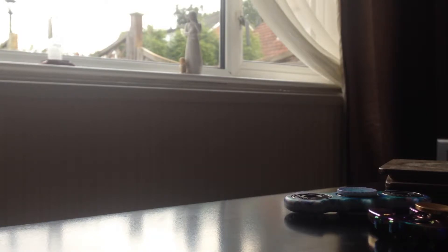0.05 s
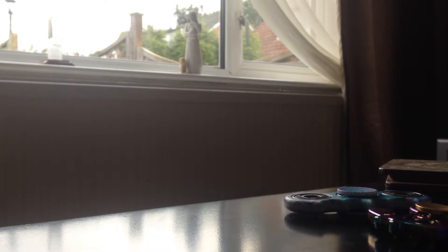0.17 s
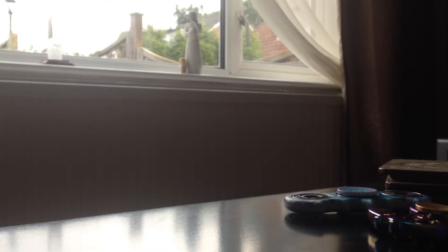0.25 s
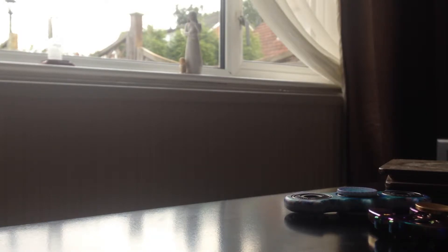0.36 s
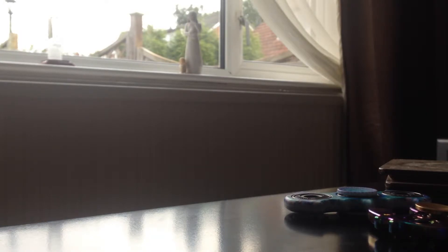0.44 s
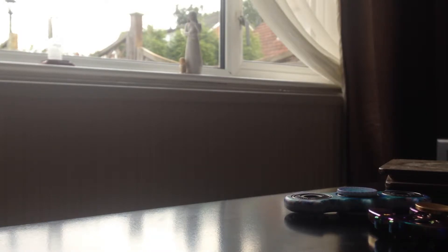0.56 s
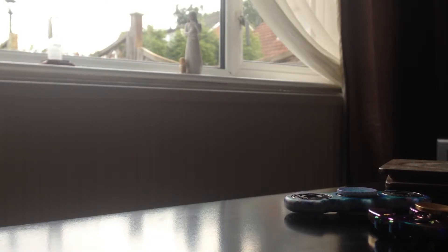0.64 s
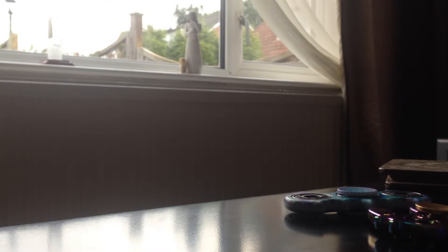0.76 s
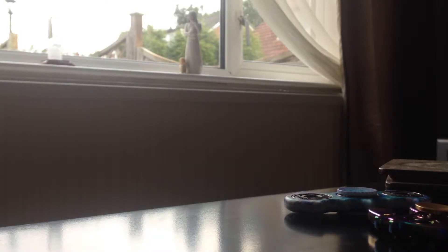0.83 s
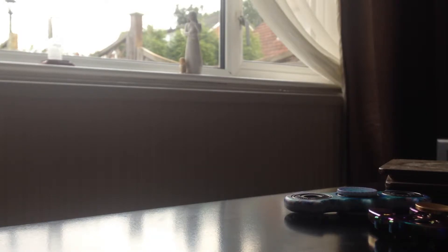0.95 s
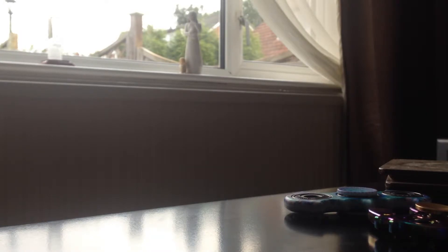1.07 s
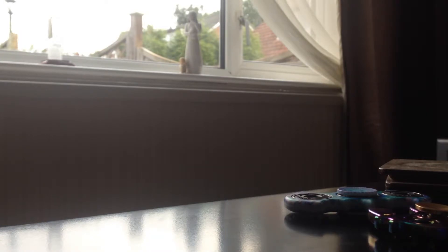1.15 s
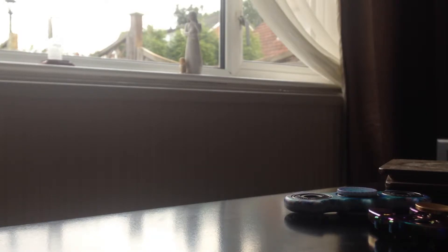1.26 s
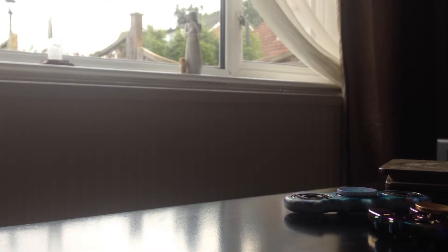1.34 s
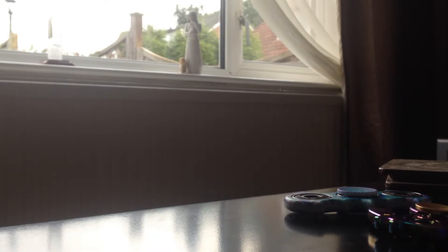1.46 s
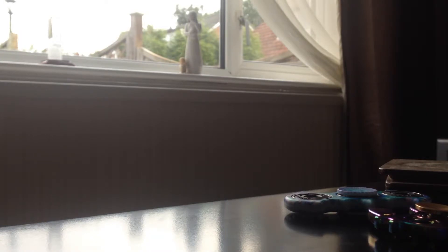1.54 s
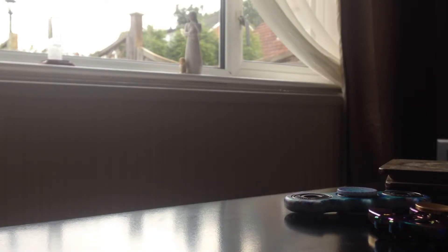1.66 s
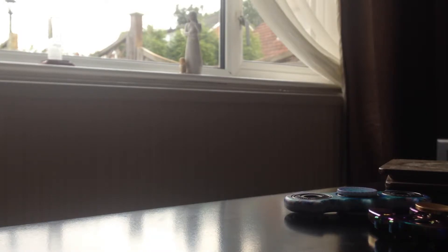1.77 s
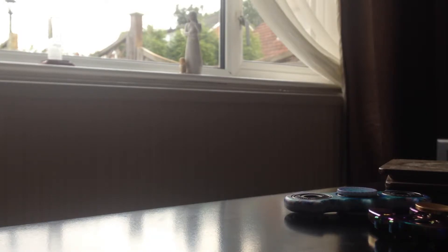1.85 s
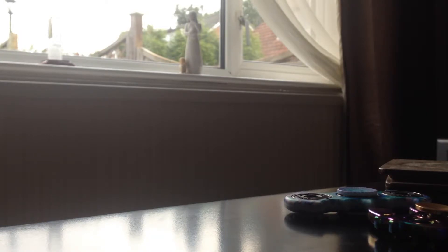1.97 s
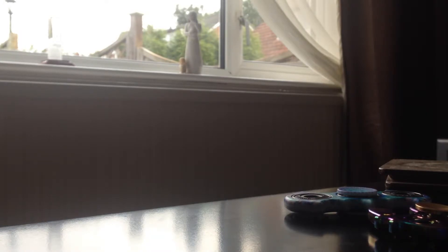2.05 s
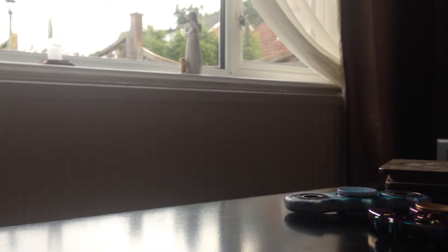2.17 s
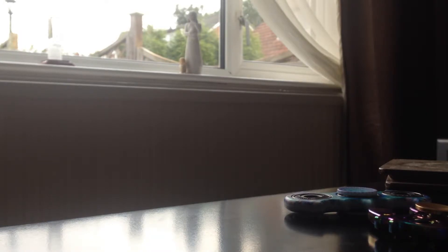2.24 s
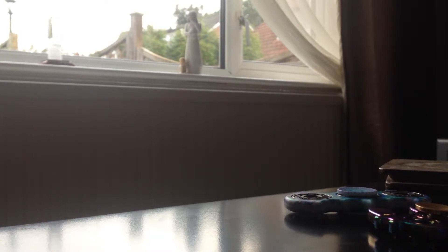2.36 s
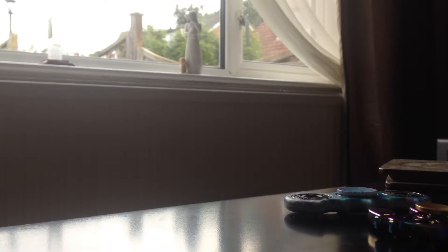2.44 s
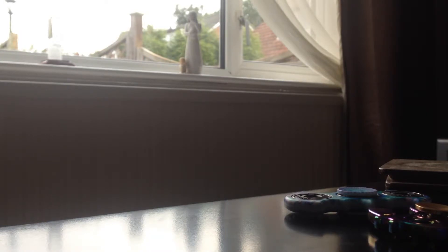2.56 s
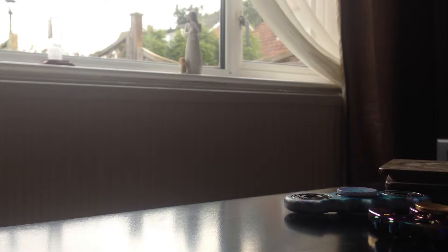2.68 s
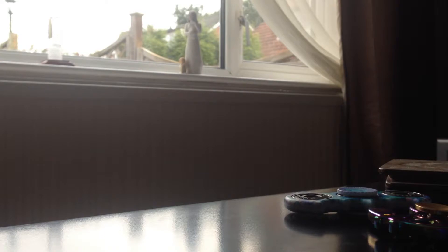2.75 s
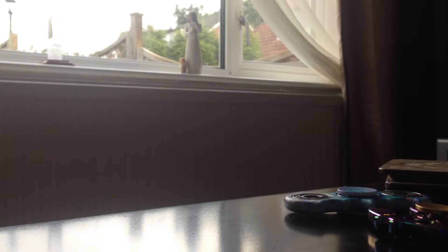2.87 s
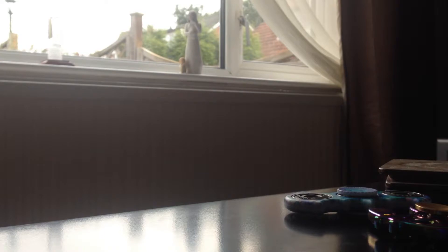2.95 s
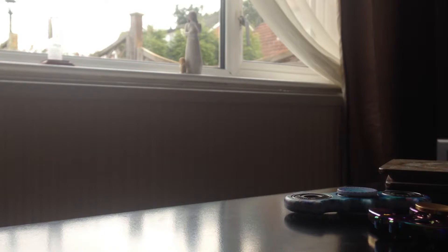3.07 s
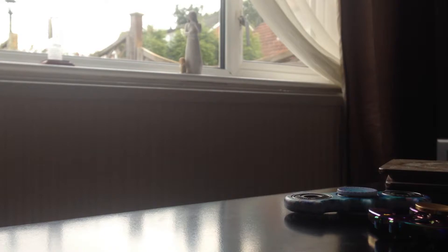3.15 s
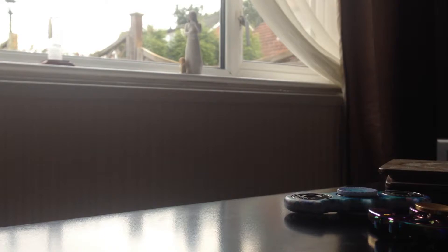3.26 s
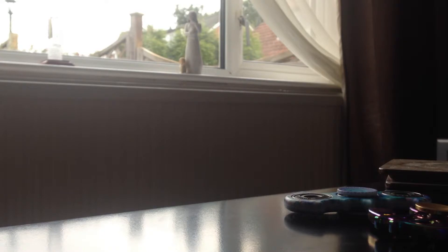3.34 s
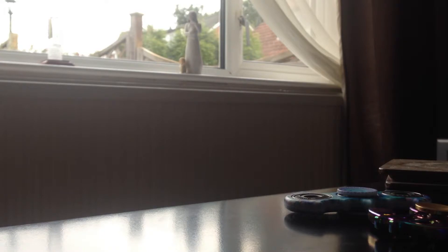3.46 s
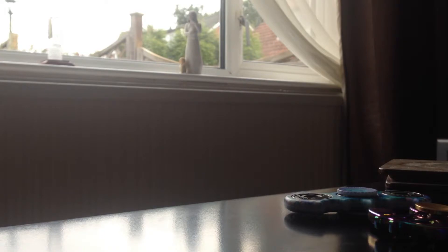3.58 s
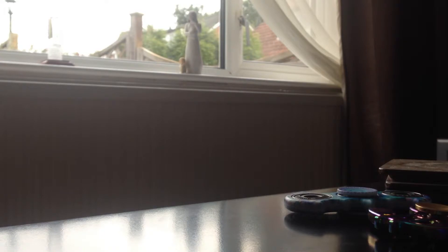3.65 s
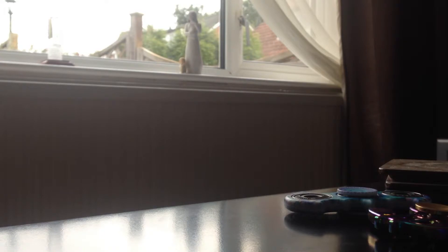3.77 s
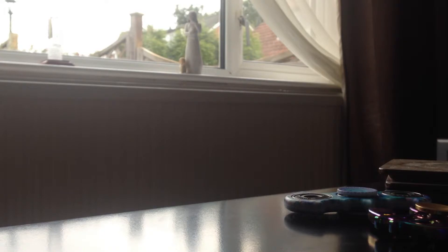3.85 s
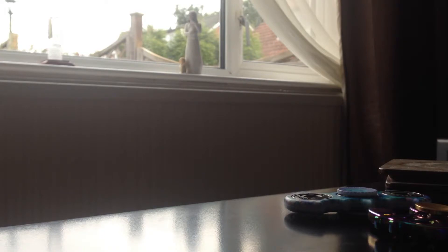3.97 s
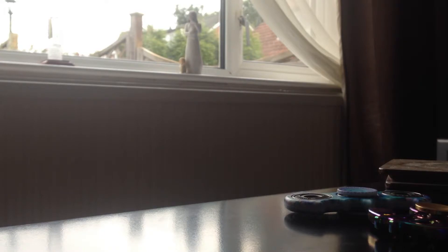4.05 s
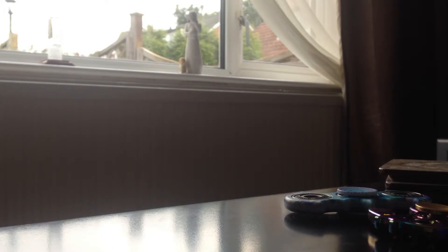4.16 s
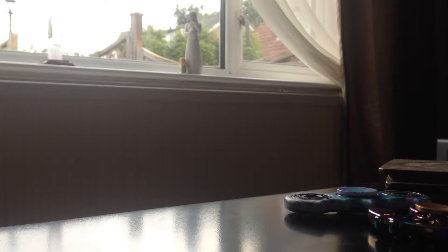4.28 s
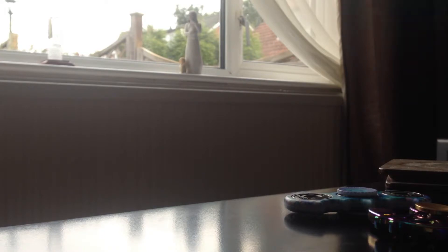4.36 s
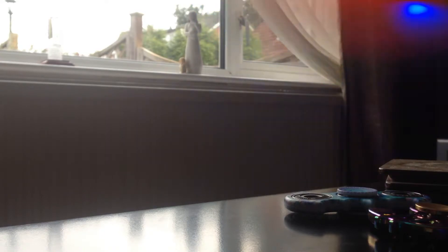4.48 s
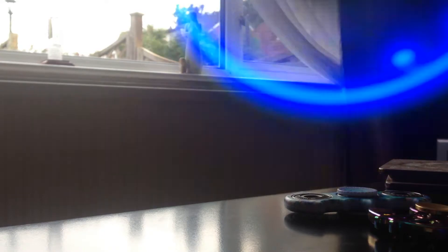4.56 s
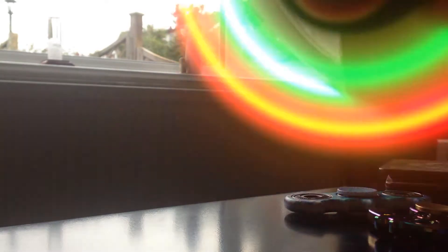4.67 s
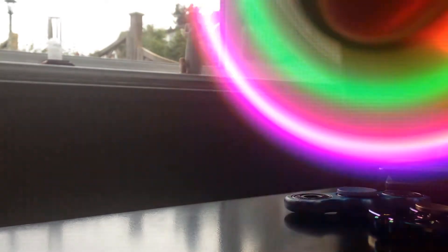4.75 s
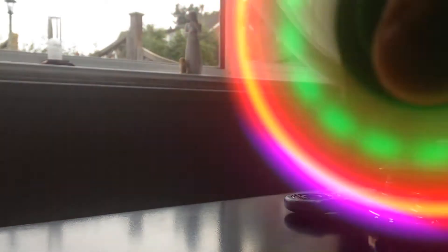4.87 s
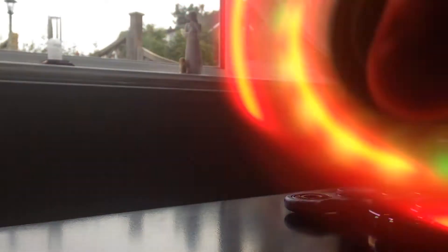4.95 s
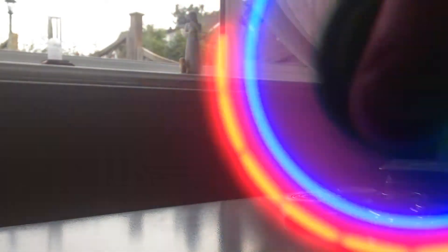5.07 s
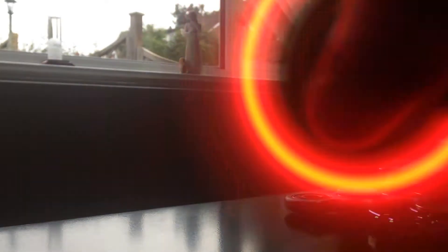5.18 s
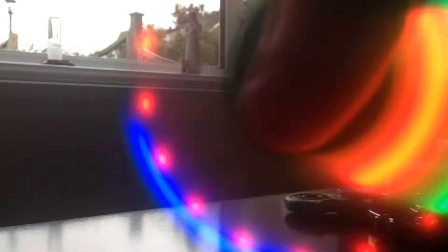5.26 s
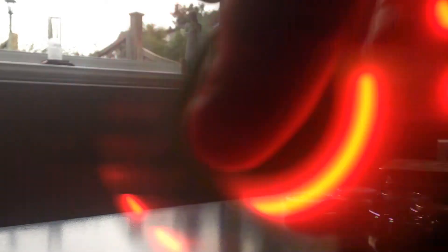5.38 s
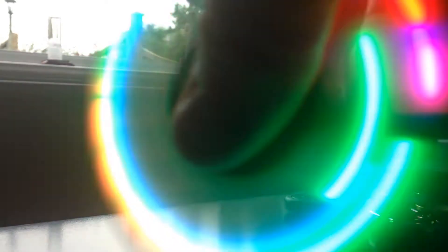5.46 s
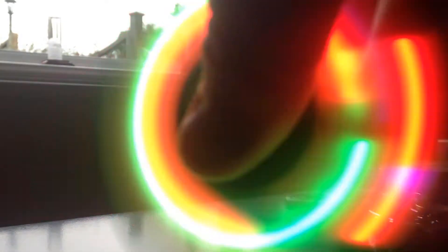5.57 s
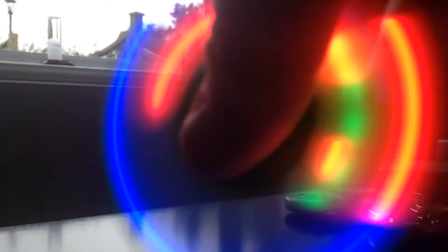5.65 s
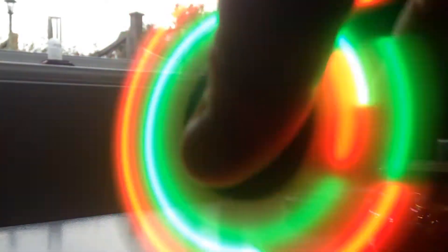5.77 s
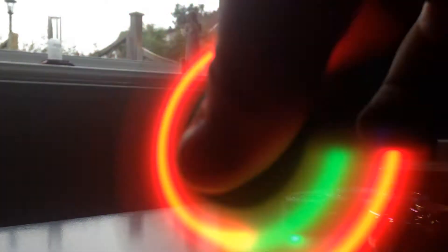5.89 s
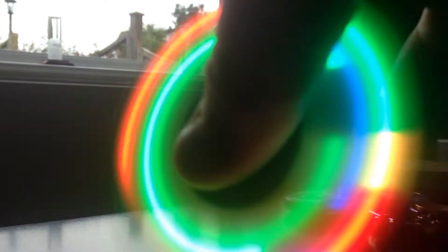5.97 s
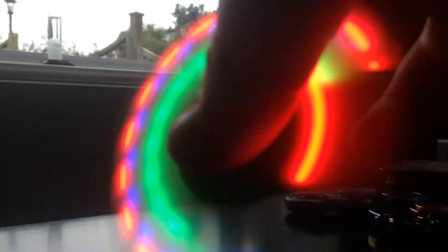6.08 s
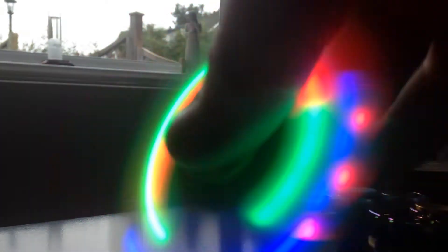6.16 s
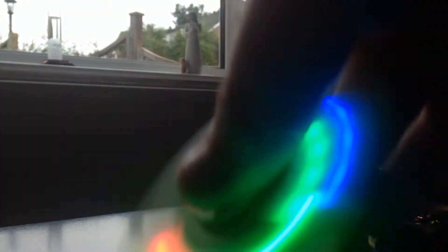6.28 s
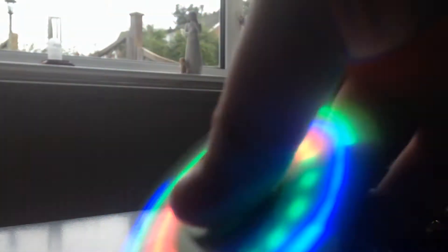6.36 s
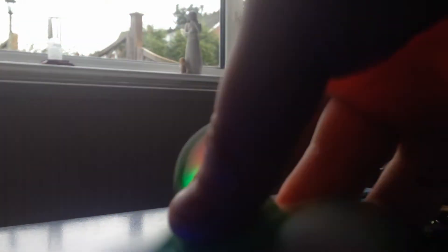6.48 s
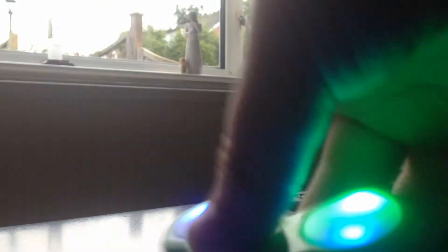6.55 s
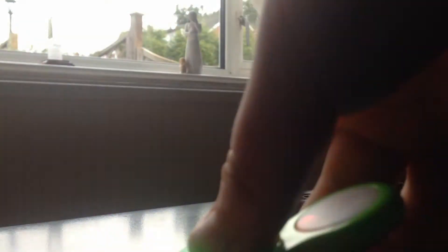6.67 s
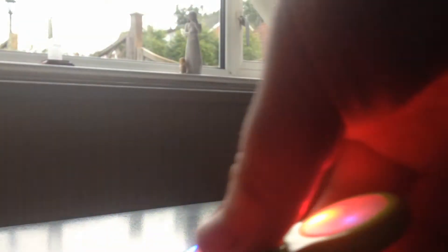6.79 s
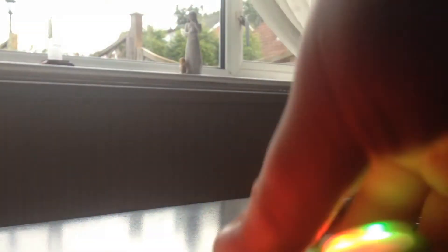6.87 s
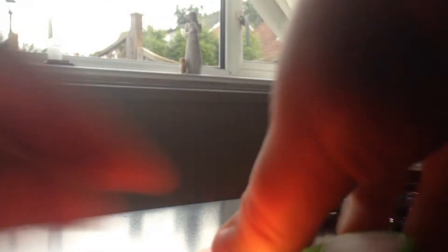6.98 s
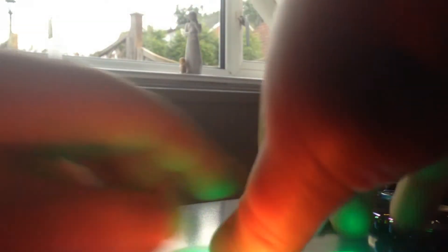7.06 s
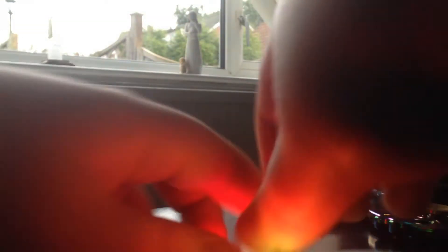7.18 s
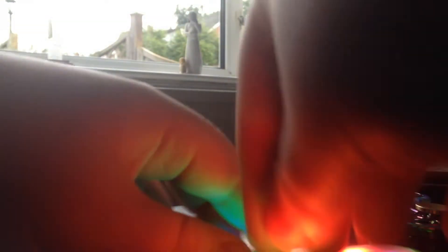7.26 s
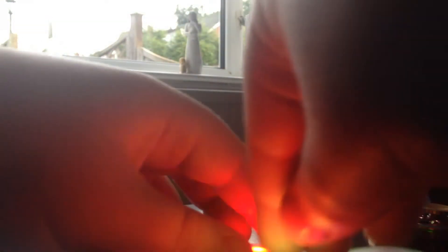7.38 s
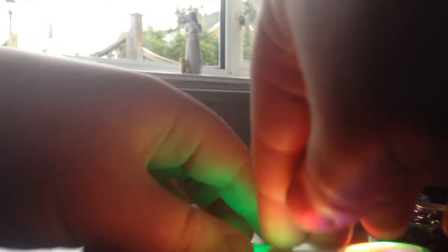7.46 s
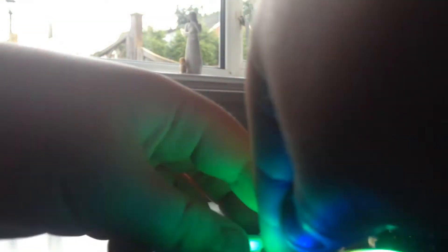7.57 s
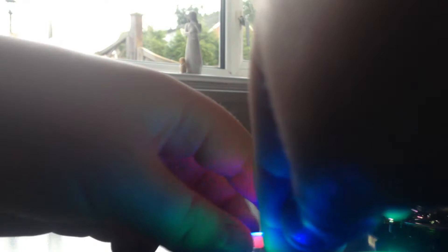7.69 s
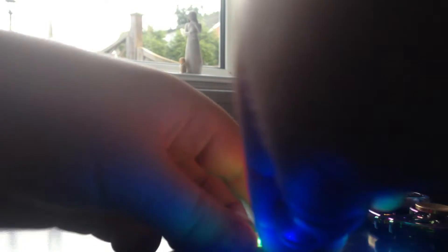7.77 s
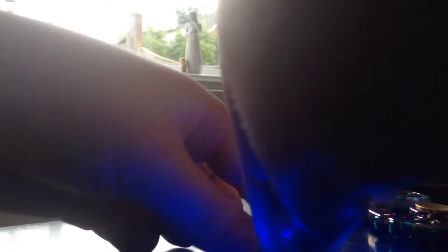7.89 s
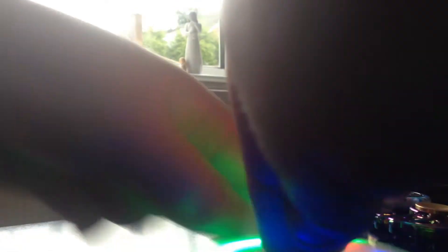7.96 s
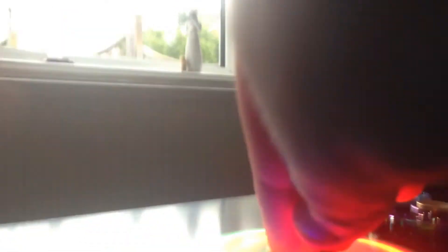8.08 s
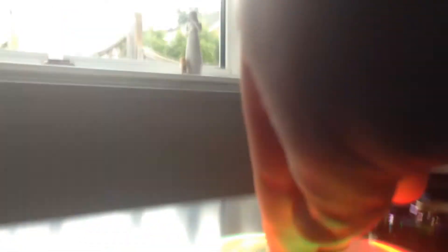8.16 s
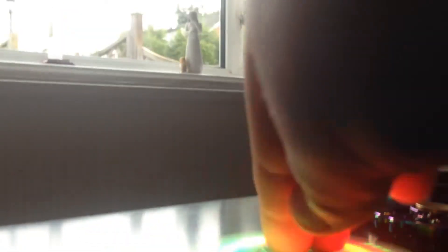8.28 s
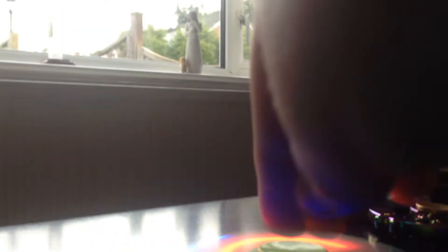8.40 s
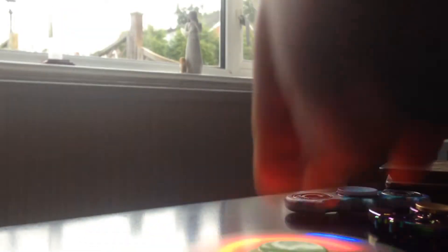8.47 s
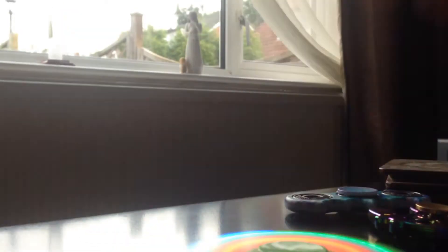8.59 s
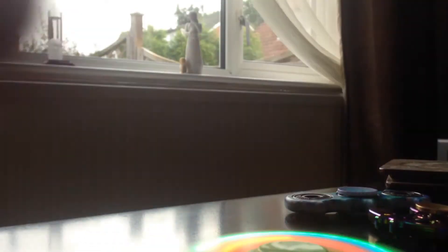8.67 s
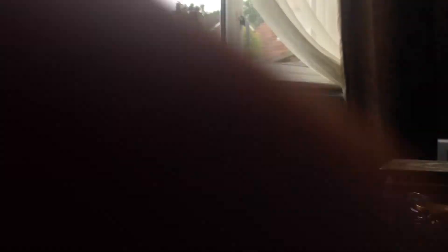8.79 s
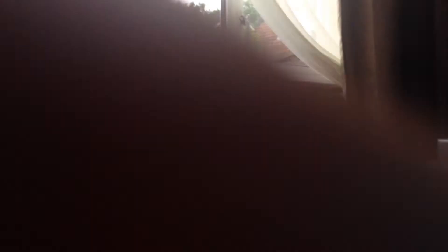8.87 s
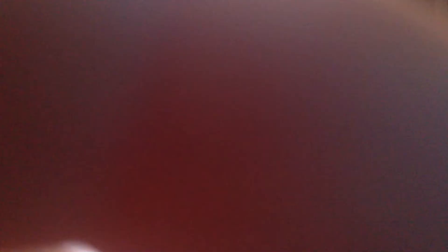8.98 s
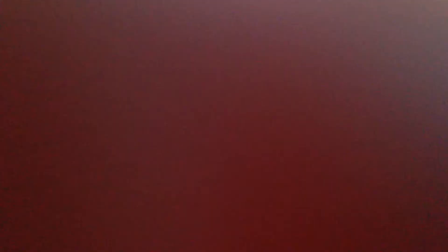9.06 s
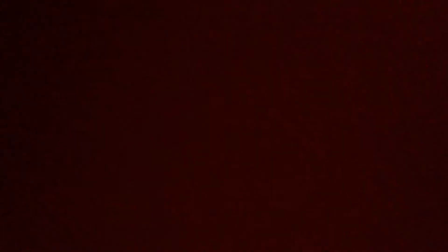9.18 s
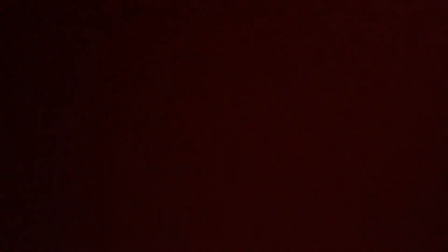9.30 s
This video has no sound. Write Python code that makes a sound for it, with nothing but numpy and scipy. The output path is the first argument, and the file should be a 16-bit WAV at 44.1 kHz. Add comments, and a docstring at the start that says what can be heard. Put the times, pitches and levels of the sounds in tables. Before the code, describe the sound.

Near-silent room, a flicked fidget spinner hisses and flutters in the hand, knocks hard on the tabletop, spins there, ends with muffled thumps.

```python
"""A three-armed plastic fidget spinner in a quiet room: ball collisions hiss through steady resonances.
After a few faint handling ticks it is flicked and whirs in the hand, clips the table four times and stops.
It clacks as it is laid flat, is flicked again and whirs on the table top, which acts as a sounding board.
Knocks, scuffs and pings are ringing modes set off by short contacts; sliding fingers are grains of noise.
At the end a hand covers and bumps the microphone with dull thumps and a rumble, over room air and hum."""
import sys
import numpy as np
from scipy import signal
from scipy.fft import rfft, irfft
from scipy.io import wavfile

SR = 44100
rng = np.random.default_rng(int(sys.argv[2]) if len(sys.argv) > 2 else 0)


def store_pcm(level_fs):
    """Save levels as 16-bit WAV."""
    pcm = np.round(np.clip(level_fs, -1, 1) * 32767).astype(np.int16)
    wavfile.write(sys.argv[1], SR, np.atleast_2d(pcm).T)


N = 411453
T = np.arange(N) / SR

# Colour tables are relative spectra [f/Hz, level/dB per Hz].
# still room air
AIR_COLOUR = [(15, -41.5), (25, -30), (101, -10.5), (133, -16.5), (359, -20.5), (495, -21.5), (620, -17.5),
              (1270, -26.5), (3170, -30.5), (6050, -34.5), (15500, -42)]
# two close low hums that beat [f/Hz, level/dB]
HUM = [(98.2, -76.5), (99.72, -79.5)]
# reverberation [f/Hz, t60/s, level/dB]
ROOM = [(200, 0.33, -16), (500, 0.9, -12.5), (900, 0.4, -11), (2020, 0.17, -12), (4930, 0.38, -23),
        (9100, 0.15, -19.5), (15200, .2, -24.5)]
# light handling ticks [t/s, level/dB, hardness/dB]
TICKS = [(1.044, -71, 3), (1.161, -61.5, -5), (1.49, -59, -8), (1.677, -65, 8), (1.877, -66, 5),
         (2.143, -58, -1.5), (2.332, -82.5, 25), (2.63, -64, -3), (2.885, -62.5, -4), (4.551, -59.5, 19),
         (7.151, -42, -2), (7.166, -45, -8), (7.354, -62.5, 10), (7.643, -55.5, 6), (7.6556, -58, 4),
         (7.683, -67, 12), (7.713, -63, -13), (7.791, -58, 14), (7.833, -63, 11), (8.031, -58.5, -12),
         (8.0837, -49, 22.5)]
# the steel bearing pings as its play is taken up [t/s, peak level/dB, f/Hz, multiple of the usual ring time]
PINGS = [(1.045, -56, 5740, .7), (1.072, -58, 5760, .7), (1.677, -58, 5800, 1.0), (2.333, -49.5, 5120, 1.5),
         (3.874, -31.5, 6450, 1), (4.623, -33, 4950, .7), (6.494, -23.5, 5860, .5), (7.147, -27, 6000, .45),
         (7.158, -26, 5900, .4), (7.166, -23, 5880, .45), (7.183, -33, 5830, .5), (7.204, -41, 5850, .5),
         (8.0955, -13.5, 5850, .5), (8.1035, -18.5, 5850, .5)]
# bearing modes [multiple of the ping's f, level/dB, t60/s]
STEEL_MODES = [(.98, -0.5, 0.024), (1, -9, 0.14), (1.06, -7.5, .02), (1.55, -11, 0.031)]
# dull thumps of the fingers, the last ones on the microphone [t/s, level/dB, f/Hz]
BUMPS = [(1.16, -57, 272), (1.331, -57.5, 415), (1.49, -60, 270), (1.623, -55.5, 210), (2.145, -57, 260),
         (2.73, -59.5, 328), (2.885, -58, 250), (2.966, -61, 258), (3.844, -56, 159), (3.912, -46.5, 134),
         (6.478, -45.5, 200), (6.513, -46.5, 200), (6.555, -45, 191), (7.15, -47.5, 147), (8.085, -45, 145),
         (8.098, -52, 59.3), (9.016, -40.5, 526), (9.136, -29.5, 374), (9.139, -58, 50), (9.192, -47, 99),
         (9.217, -35, 337), (9.221, -37, 170), (9.278, -30.5, 171)]
# short scuffs of a finger or an arm [t/s, level/dB, hardness/dB, weight/dB]
SCUFFS = [(3.8465, -45, 9, -8), (3.8705, -49.5, 15, -13), (3.913, -58, 2, -1), (6.443, -43.5, -19, 5.5),
          (6.491, -33, -3, -13), (6.559, -34, -3, -9), (7.066, -41.5, -34, -11), (7.106, -40.5, -2.5, -28),
          (7.145, -46, -14, 8.5), (7.154, -59.5, 27, 6), (7.389, -60.5, -1, 2), (7.655, -59, 5.5, 4.5),
          (7.769, -53, -11, -7.5), (8.056, -58, -22, 11), (8.075, -44, -28, 16), (8.099, -41, -12, 0)]
# plastic strikes the table; each spot favours one resonance of the table and one of the shell
# [t/s, level/dB, hardness/dB, weight/dB, table f/Hz, shell f/Hz, shell lift/dB, arm ring level/dB]
KNOCKS = [(6.4577, -24, 8, -12.5, 597, 3350, 11, -34), (6.478, -23, 8, -6.5, 615, 3000, 7.5, -35.5),
          (6.5131, -20.5, 2, -7.5, 660, 3150, 2.5, -39), (6.555, -22.5, 6, -11, 660, 4300, 2.5, -41),
          (6.9941, -21, 2.5, -32.5, 1080, 4950, 9.5, -45), (7.1101, -37.5, -4, -23, 1150, 3710, 21, -60.5),
          (7.2213, -21, -1, -24, 765, 4600, 0, -46), (7.488, -27, -1.5, -19, 768, 6400, 8.5, -59),
          (7.7917, -43, -56, -16, 785, 4500, -3, -72), (8.085, -27, -27, -3.5, 647, 4500, 5, -65.5),
          (8.0946, -41.5, 22.5, -2, 650, 6400, 11, -62)]
# laid flat, the spinner rocks to rest: its first bounce
# [t/s, level/dB, hardness/dB, weight/dB, table f/Hz, shell f/Hz, shell lift/dB]
ROCKING = (7.2336, -28.5, -8, -16, 850, 5200, 3)
# modes of the table top: deep thud and board [f/Hz, level/dB, t60/s]
THUD_MODES = [(315, -4, 0.037), (428.6, 16, 0.1)]
BOARD_MODES = [(618, -1, 0.083), (686, 2, 0.061), (778, 6, 0.033), (883, 10, 0.031), (1017, 0, 0.045),
               (1064, -1, 0.03), (1150, -4, .04), (1410, -8, 0.025), (1637, -12.5, 0.14),
               (2030, -13, 0.054)]
# modes of the spinner: shell, sharp crack and arms [f/Hz, level/dB, t60/s]
SHELL_MODES = [(2420, -8.5, 0.0098), (2980, 0.5, 0.011), (3270, -2, 0.009), (3620, -3, 0.0058),
               (4200, -1.5, 0.005), (4480, 5, 0.0064), (5060, 5, 0.006), (5870, 3.5, 0.0097),
               (6420, 2, 0.0038)]
CRACK_MODES = [(7440, -8.5, 0.0048), (8520, -3.5, 0.0064), (9600, -5, 0.007), (10200, -2.5, 0.007),
               (11340, -3, 0.004), (12900, -8, 0.0054)]
ARM_MODES = [(2859, -5, .1), (3000, -0.5, 0.084), (3050, 1.5, .11), (3150, -3.5, 0.07), (3240, -6.5, 0.083)]
# bearing hiss in the hand [t/s, level/dB]
IN_HAND = [(3.95, -60.5), (4.22, -58), (4.38, -47), (4.46, -43), (4.55, -43), (4.585, -48), (4.9, -47.5),
           (5.35, -44.5), (5.7, -45.5), (6.45, -45.5)]
# the races sing as the grip tilts the bearing [t/s, f/Hz, level against the hiss/dB]
RACES = [(4.1, 3100, -13.5), (4.35, 3730, -4.5), (4.42, 4300, -0.5), (4.47, 5750, -2.5), (4.56, 5900, 1),
         (4.62, 5500, -3), (4.68, 5450, 6), (4.81, 5260, 6), (4.85, 5100, -8.5), (4.93, 5200, -1),
         (4.99, 5400, 1.5), (5.07, 5300, -5), (5.19, 5300, 1.5), (5.28, 5300, -7.5), (5.39, 5500, 1.5),
         (5.49, 5700, 1), (5.6, 5750, -9.5), (5.8, 6000, -4.5), (6.3, 6000, 0.5), (6.45, 5870, -11)]
# bearing in the hand: off to the side, and in front of the microphone
ASIDE_COLOUR = [(400, -21), (750, -11), (1000, -31), (1400, -6), (2350, -13), (3000, -7), (4150, 5),
                (4900, -4), (6300, 1), (7200, -3.5), (8300, 1), (9100, -2), (9700, -9), (15000, -13)]
HAND_COLOUR = [(240, -53.5), (400, -18.5), (673, -12.5), (1100, -25.5), (1380, -2.5), (1540, -16),
               (2360, -12.5), (4160, -3), (4560, -8), (5820, -3.5), (7910, -7), (8930, -9), (11100, -16),
               (14600, -10), (15500, -18)]
# small steady resonances of the plastic frame [f/Hz, width/Hz, level/dB]
FRAME_RESONANCES = [(660, 84, -5), (880, 510, -9), (1400, 110, 1.5), (1800, 220, -1.5), (3177, 190, 4.5),
                    (4166, 180, 3.5), (6480, 200, 10), (7750, 180, -1.5), (8930, 500, 1)]
# fingers slide on the plastic [t/s, length/s, level/dB], and their colour
RUBS = [(6.79, 0.16, -61), (6.929, 0.36, -49), (7.303, 0.22, -64), (7.619, 0.15, -60), (7.716, 0.23, -67.5),
        (8.03, 0.16, -48.5)]
RUB_COLOUR = [(300, -0.5), (800, 8.5), (1800, -1.5), (3200, -3), (6000, -4.5), (9000, -9), (15000, -17.5)]
# bearing on the table: running free, under pressing fingers, and with the microphone covered
TABLE_COLOUR = [(710, -35.5), (1200, -4.5), (1390, -12.5), (1620, -10), (2260, -7.5), (2800, 1),
                (3580, -3.5), (4430, -3.5), (5370, -5.5), (6730, -5.5), (9780, -16.5), (14200, -20.5),
                (15500, -25.5)]
PRESSED_COLOUR = [(710, -32.5), (1200, -3.5), (1650, -3), (2300, -6.5), (2800, -1), (3250, 3.5), (3800, 1),
                  (4350, 0.5), (5100, -6.5), (5600, -12.5), (6250, -14), (6850, 2), (7400, -9),
                  (8900, -9.5), (12000, -13.5), (15000, -20.5)]
COVERED_COLOUR = [(710, -40.5), (1200, -21), (1380, -17), (1570, -5), (1940, -4.5), (2160, -21.5),
                  (2680, -20), (4380, -4.5), (5040, -7), (6870, -0.5), (9500, -9), (11500, -25.5),
                  (15500, -37)]
# table top under the rolling balls, and the cap of the lying spinner [f/Hz, width/Hz, level/dB]
TABLE_RESONANCES = [(406, 100, 1.5), (706, 120, 7), (1090, 110, -2.5), (1600, 180, -0.5), (2000, 290, -4.5)]
CAP_RESONANCES = [(2616, 110, -0.5), (2800, 110, 0), (3080, 200, -2), (3290, 200, -2)]
# a hand closes over the microphone [t/s, cover from 0 open to 1, share of the highest hiss shaded off]
COVER = [(8.7, 0.056, 0.015), (8.95, 0, 0.64), (9.11, 0.068, 0.64), (9.19, 0.48, 0.33), (9.33, 0.76, 0.35)]
# the palm drags over the microphone [t/s, level/dB], and its dull colour
PALM = [(9.10, -90), (9.14, -55), (9.17, -60), (9.2, -55), (9.24, -53), (9.265, -60), (9.29, -45.5),
        (9.33, -62)]
PALM_COLOUR = [(45, -6), (120, -2), (330, -4), (520, -13), (1200, -44)]
# treble resonances of the microphone's port [f/Hz, width/Hz, level/dB]
PORT = [(9160, 540, 2), (9430, 550, -4), (10470, 450, 1), (11050, 600, -1.5), (12200, 450, 2.5),
        (13750, 340, -1), (14300, 450, 5.5)]

AIR_DB, CUTOFF_HZ = -71.2, 15500
# the spin in the hand lasts from the flick until the arms hit the table
FLICK_S, STOP_S = 3.95, 6.45
FLICK_TURNS_PER_S, DRAG_TURNS_PER_S2 = 21, 0.85
# a finger brushes the arms and takes off some speed
BRUSH_S, BRUSH_LENGTH_S, BRUSH_LOSS_TURNS_PER_S = 4.5, 0.21, 3.1
# the spinner is carried from the side, past the microphone, to a place in front of it
CARRY_S, CLOSEST_S, IN_FRONT_S = 4.49, 4.46, 4.57
# it is lowered toward the table, and its draught leaves the microphone
LOWERED_S = 6.15
# air pushed by the arms: level far off, gain at the closest point, time to come and to go
FAN_DB, FAN_PASS_DB, FAN_COME_S, FAN_GO_S = -71, 18, 0.25, 0.15
# the spin on the table: start, fingers let go of the cap, time the letting go takes
TABLE_SPIN_S, LET_GO_S, LET_GO_TAKES_S = 8.12, 8.25, 0.24
BEARING_DB, BEARING_FADE_DB_PER_S = -41, 4.5
# the table top sounds louder while the spinner is pressed on it; the fingers mute the cap
TOP_DB, PRESSED_TOP_DB, CAP_DB, PRESSED_CAP_DB = -53, 11, -7.5, -11
# the balls passing the loaded side of the bearing give the whirr on the table a fine grain
BALL_PASS_HZ, BALL_PASS_DB = 366, 1.0
# the covering hand throws the hiss back into the microphone, and shades it above a corner
COVER_GAIN_DB, SHADE_HZ = 8.5, 8600
BOUNCE_GAP_S, BOUNCE_LOSS_DB = 0.0135, 6.0
# share of a contact's hardness that reaches the shell; the crack gets all of it
SHELL_HARDNESS = 0.59
# a light blow hardly moves the table's lowest modes: corner, and share of the weight per octave below it
LOW_MODES_HZ, LOW_MODES_FOLLOW = 940, 0.18
# lift of the favoured table resonance, and how far either lift reaches
SPOT_LIFT_DB, SPOT_OCTAVES = 7.5, 0.2
# the grip loads the spinner's modes, not the table's: relative spread of pitch, and the lowest pitch it reaches
GRIP_DETUNE, GRIP_ABOVE_HZ = 0.012, 2200
BUMP_CYCLES = 4.6   # a thump falls by 60 dB within this many cycles
# sliding skin catches and slips: depth, catches per second
CATCH_DB, CATCH_PER_S = 3.5, 70


def from_db(db):
    """Decibels to gain."""
    return 10 ** (np.asarray(db) / 20)


def rms_one(x):
    """Scale to unit rms."""
    return x / np.sqrt(np.mean(x ** 2) + 1e-20)


def in_time(rows):
    """Each column of a curve at every sample."""
    s, *columns = np.transpose(rows)
    return [np.interp(T, s, c) for c in columns]


def ramp(start, length):
    """Rise from 0 to 1, then stay."""
    return np.clip((T - start) / length, 0, 1)


def gate(start, end, fade_in, fade_out):
    """Full between two times, fading to silence outside them."""
    return ramp(start - fade_in, fade_in) * (1 - ramp(end, fade_out))


def blend(share, first, second):
    """Pass from one colour to another at steady power."""
    share = np.clip(share, 0, 1)
    return np.sqrt(1 - share) * first + np.sqrt(share) * second


def add(out, s, sound):
    """Mix a sound in at a time."""
    start = int(s * SR)
    out[start:start + len(sound)] += sound[:N - start]


def drift(rate):
    """Random wander of rms 1 through a given number of points per second."""
    points = rng.standard_normal(int(N / SR * rate) + 2)
    return rms_one(np.interp(T * rate, np.arange(len(points)), points))


def coloured(x, spectrum):
    """Give a steady sound a spectrum that falls steeply at the low end; rms 1."""
    hz, db = np.transpose(spectrum)
    f = np.maximum(np.arange(N // 2 + 1) * SR / N, 1)
    gain = from_db(np.interp(np.log(f), np.log(hz), db))
    gain = gain * np.minimum(f / hz[0], 1) ** 2
    return rms_one(irfft(rfft(x) * gain, N))


def resonate(x, resonances, flutter_db=1.5):
    """Parallel resonances of alternating sign, each driven harder or softer as the contacts shift; rms 1."""
    out = 0
    for k, (hz, width, db) in enumerate(resonances):
        r = np.exp(-np.pi * width / SR)
        ring = signal.lfilter([1, 0, -1], [1, -2 * r * np.cos(2 * np.pi * hz / SR), r * r], x)
        flutter = flutter_db * (drift(35) + 0.54 * drift(7))
        out = out + (-1) ** k * from_db(db + flutter) * (1 - r * r) * ring
    return rms_one(out)


def rolling(per_s, spread_db):
    """Random tiny impacts of uneven size, as of balls on cage and races; rms 1."""
    sizes = from_db(spread_db * np.minimum(rng.exponential(1, N), 4))
    sizes = sizes * rng.choice([-1, 1], N)
    return rms_one(sizes * (rng.random(N) < per_s / SR))


def flicker(x, depth_db, per_s, count):
    """Narrow bands of a hiss waver, each on its own."""
    spectrum = rfft(x)
    position = np.linspace(0, 1, len(spectrum), endpoint=False)
    band = (np.sqrt(position) * count).astype(int)
    gains = (rms_one(from_db(depth_db * drift(per_s))) for _ in range(count))
    return sum(gain * irfft(spectrum * (band == k), N) for k, gain in enumerate(gains))


def struck(modes, t, scatter_db):
    """Free ringing of a set of modes; each blow shares its force out differently."""
    hz, db, t60 = np.transpose(modes)[:, :, None]
    gain = from_db(db + scatter_db * rng.standard_normal(hz.shape))
    detune = 1 + GRIP_DETUNE * (hz > GRIP_ABOVE_HZ) * rng.standard_normal(hz.shape)
    decay = np.exp(-np.log(1000) * t / t60)
    return np.sum(gain * np.cos(2 * np.pi * hz * detune * t) * decay, axis=0)


def shares(db, hardness_db, weight_db):
    """Levels of thud, board, shell and crack: weight drives the thud, hardness the spinner's high modes."""
    return db + weight_db, db, db + SHELL_HARDNESS * hardness_db, db + hardness_db


def weighted(modes, weight_db):
    """Modes as a blow of some weight drives them."""
    octaves_below = [max(np.log2(LOW_MODES_HZ / hz), 0) for hz, *_ in modes]
    return [(hz, db + LOW_MODES_FOLLOW * weight_db * octaves, t60)
            for (hz, db, t60), octaves in zip(modes, octaves_below)]


def favoured(modes, spot_hz, lift_db):
    """The spot that is struck drives the modes near one pitch harder."""
    return [(hz, db + lift_db * np.exp(-(np.log2(hz / spot_hz) / SPOT_OCTAVES) ** 2), t60)
            for hz, db, t60 in modes]


def bodies(spot):
    """Modes of thud, board, shell and crack for a blow on a given spot, or for a broad touch."""
    if not spot:
        return THUD_MODES, BOARD_MODES, SHELL_MODES, CRACK_MODES
    table_hz, shell_hz, lift_db = spot[:3]
    board = favoured(BOARD_MODES, table_hz, SPOT_LIFT_DB)
    return THUD_MODES, board, favoured(SHELL_MODES, shell_hz, lift_db), CRACK_MODES


def contacts(rows, part_db, chatter, chatter_s, damping, swell_s=0):
    """One click and a dying chatter of the surfaces ring table and spinner; a sliding contact swells."""
    out, t = np.zeros(N), T[:SR // 6]
    # each part radiates little outside the range of its modes
    radiation = []
    for modes in (THUD_MODES, BOARD_MODES, SHELL_MODES, CRACK_MODES):
        edges = 0.86 * modes[0][0], min(1.23 * modes[-1][0], 15000)
        radiation.append(signal.butter(4, edges, "band", fs=SR, output="sos"))
    for s, blow_db, hardness_db, weight_db, *spot in rows:
        force = rng.standard_normal(len(t)) * rng.exponential(1, len(t)) * np.exp(-t / chatter_s)
        force *= chatter / np.linalg.norm(force)
        force[0] -= 1   # the click
        if swell_s:
            force *= 1 - np.exp(-t / swell_s)
        levels = shares(blow_db, hardness_db, weight_db)
        for modes, sos, db, trim_db in zip(bodies(spot), radiation, levels, part_db):
            ring = struck(weighted(modes, weight_db), t, scatter_db=2.5)
            ring = ring * np.exp(-damping * t)   # fingers damp the ring
            sound = signal.sosfilt(sos, signal.fftconvolve(force, ring)[:len(t)])
            # a level is the energy of the ring spread over 10 ms
            sound = sound / np.linalg.norm(sound) * np.sqrt(SR // 100)
            add(out, s, from_db(db + trim_db) * sound)
    return out


def background():
    """Still room air that wavers a little, and a slowly beating hum."""
    hum = sum(from_db(db) * np.sin(2 * np.pi * hz * T) for hz, db in HUM)
    air = coloured(rng.standard_normal(N), AIR_COLOUR)
    return hum + from_db(AIR_DB + 0.37 * drift(1.0)) * air


def ticks():
    """Light touches with an even click and chatter, so damped that they barely ring."""
    rows = [(*tick, 0) for tick in TICKS]   # no added weight
    return contacts(rows, part_db=(-6.0, 0.0, -7.5, -14.5), chatter=1.0, chatter_s=0.0026, damping=1700)


def pings():
    """Short steel rings of the bearing."""
    out = np.zeros(N)
    for s, db, hz, length in PINGS:
        modes = [(hz * k, mode_db, t60 * length) for k, mode_db, t60 in STEEL_MODES]
        ring = struck(modes, T[:SR // 6], scatter_db=3.0)
        add(out, s, from_db(db) * ring / np.abs(ring).max())
    return out


def bumps():
    """Soft, quickly damped thumps: low sines with a rounded onset."""
    out, t = np.zeros(N), T[:SR // 6]
    for s, db, hz in BUMPS:
        onset = (1 - np.exp(-t / 0.0018)) ** 2
        shape = onset * np.exp(-np.log(1000) * t * hz / BUMP_CYCLES)
        add(out, s, -from_db(db) * shape / shape.max() * np.sin(2 * np.pi * hz * t))
    return out


def scuffs():
    """Rough sliding contacts that swell and chatter, damped by the skin."""
    return contacts(SCUFFS, part_db=(-2.0, 0.6, 0.0, -9.0), chatter=1, chatter_s=0.0077, damping=600,
                    swell_s=.004)


def rotation():
    """Angle of the hand-held spinner, slowed by steady drag and once by a finger."""
    brush_loss = BRUSH_LOSS_TURNS_PER_S * ramp(BRUSH_S, BRUSH_LENGTH_S)
    turns_per_s = FLICK_TURNS_PER_S - DRAG_TURNS_PER_S2 * (T - FLICK_S) - brush_loss
    return 2 * np.pi * np.cumsum(turns_per_s) / SR


def singing_races(wobble):
    """Slips of the balls drive one resonance that glides with the tilt of the bearing; rms 1."""
    race_hz = in_time(RACES)[0]
    r = np.exp(-np.pi * 680 / SR)   # from the ring's width in Hz
    carrier = np.exp(2j * np.pi * np.cumsum(race_hz) / SR)
    slips = rolling(per_s=720, spread_db=-1.0) * from_db(1.5 * wobble + 0.78 * drift(30))
    # shift the slips down, ring them around zero, shift them back up to the moving pitch
    ring = signal.lfilter([1], [1, -2 * r, r * r], slips / carrier)
    return rms_one(np.real(carrier * ring))


def spin_in_hand():
    """The bearing hisses and flutters, surging with each turn, and its races ring at a shifting pitch."""
    level = from_db(in_time(IN_HAND)[0]) * gate(FLICK_S, STOP_S, fade_in=0.16, fade_out=.03)
    in_front = ramp(CARRY_S, IN_FRONT_S - CARRY_S)
    angle = rotation()
    wobble = np.cos(angle) + 0.57 * np.cos(2 * angle) + .5 * drift(40)
    surge = from_db(0.36 * wobble + 1.1 * drift(260))
    aside = coloured(rolling(per_s=7600, spread_db=1.5), ASIDE_COLOUR)
    balls = coloured(rolling(per_s=9100, spread_db=0.5) * surge, HAND_COLOUR)
    frame = resonate(rolling(per_s=3000, spread_db=4.5) * surge, FRAME_RESONANCES, flutter_db=2.0)
    front = from_db(-6) * balls + from_db(-9.0) * frame
    race_db = in_time(RACES)[1]
    races = from_db(race_db - 5.0) * singing_races(wobble)
    return level * (blend(in_front, from_db(-2.5) * aside, front) + races)


def fanning():
    """The three arms push a low tone and a soft wake against the microphone."""
    pass_s = np.where(T < CLOSEST_S, FAN_COME_S, FAN_GO_S)
    closeness = np.exp(-((T - CLOSEST_S) / pass_s) ** 2)
    level = from_db(FAN_DB + FAN_PASS_DB * closeness) * gate(FLICK_S, LOWERED_S, fade_in=0.037, fade_out=.3)
    arms = 3 * rotation()   # three arms pass per turn
    tone = rms_one(np.sin(arms) + from_db(-17.0) * np.sin(2 * arms))
    tone = tone * from_db(-2.5 + (5.5 - 3.6 * closeness) * drift(8.9))   # steadier close by
    wake_colour = [(40, -2.0), (70, 6.0), (130, -3.0), (300, -11.0), (900, -24.0), (4000, -65.5)]
    wake = coloured(rng.standard_normal(N), wake_colour)
    return level * (tone + from_db(-0.5 - 13.5 * closeness) * wake)


def bounces(first, count):
    """A contact repeats at even gaps, weaker each time."""
    s, db, *rest = first
    return [(s + k * BOUNCE_GAP_S, db - k * BOUNCE_LOSS_DB, *rest) for k in range(count)]


def knocks():
    """Hard plastic blows, lightly damped, and the bounces of the spinner rocking to rest."""
    rows = KNOCKS + bounces(ROCKING, count=3)
    return contacts(rows, part_db=(-1.0, 0.0, 1.0, -12.0), chatter=0.61, chatter_s=0.0032, damping=2.9)


def arms_ring():
    """Each knock leaves the arms ringing, at a level of its own (energy spread over 10 ms)."""
    out = np.zeros(N)
    for s, *_, db in KNOCKS:
        ring = struck(ARM_MODES, T[:SR // 4], scatter_db=1.0)
        add(out, s, from_db(db) * ring / np.linalg.norm(ring) * np.sqrt(SR // 100))
    return out


def fingers():
    """Skin slips over plastic in small grains, catching as it goes; each slide swells and fades."""
    rub = sum(from_db(db) * np.sin(np.pi * ramp(s, length)) for s, length, db in RUBS)
    catches = rms_one(from_db(CATCH_DB * drift(CATCH_PER_S)))
    return rub * catches * coloured(rolling(per_s=3200, spread_db=2.5), RUB_COLOUR)


def spin_on_table():
    """Lying flat, the bearing drives cap and table top; fingers and a nearing hand recolour the hiss."""
    cover, shade = in_time(COVER)
    pressed = 1 - ramp(LET_GO_S, LET_GO_TAKES_S)
    running = gate(TABLE_SPIN_S, T[-1], fade_in=0.083, fade_out=.1)
    fade_db = BEARING_FADE_DB_PER_S * (T - TABLE_SPIN_S)
    bearing_level = running * from_db(BEARING_DB - fade_db + COVER_GAIN_DB * cover)
    top_level = running * from_db(TOP_DB + PRESSED_TOP_DB * pressed)
    turn_db = 0.56 * np.cos(2 * np.pi * 24 * T)   # a surge 24 times a second
    ball_db = BALL_PASS_DB * np.cos(2 * np.pi * BALL_PASS_HZ * T)
    surge = from_db(turn_db + ball_db + 0.75 * drift(170))
    free, held, covered, cap, board = [rolling(per_s=4500, spread_db=-0.5) * surge for _ in range(5)]
    hiss = blend(pressed, coloured(free, TABLE_COLOUR), from_db(-0.5) * coloured(held, PRESSED_COLOUR))
    hiss = blend(cover, hiss, coloured(covered, COVERED_COLOUR))
    highest = signal.sosfiltfilt(signal.butter(6, SHADE_HZ, "high", fs=SR, output="sos"), hiss)
    hiss = hiss - np.clip(shade, 0, 1) * highest
    cap = from_db(CAP_DB + PRESSED_CAP_DB * pressed) * resonate(cap, CAP_RESONANCES, flutter_db=0.0)
    top_band = signal.butter(2, [320, 2400], "band", fs=SR, output="sos")
    board = signal.sosfilt(top_band, resonate(board, TABLE_RESONANCES, flutter_db=1.5))
    return bearing_level * (from_db(-2.0) * hiss + cap) + top_level * rms_one(board)


def palm():
    """Lumpy rumble of skin on the microphone, under the last thumps."""
    level = from_db(in_time(PALM)[0]) * gate(PALM[0][0], T[-1], fade_in=.01, fade_out=.01)
    return level * coloured(rolling(per_s=900, spread_db=2), PALM_COLOUR)


def room(x):
    """Diffuse reflections of a small furnished room: bands of noise, each with its own decay."""
    t, response = T[:SR // 2], 0
    hz, t60, db = np.transpose(ROOM)
    edges = np.geomspace(120, 16000, 15)
    for low, high in zip(edges, edges[1:]):
        band_filter = signal.butter(2, [low, high], "band", fs=SR, output="sos")
        band = signal.sosfilt(band_filter, rng.standard_normal(len(t)))
        centre = np.sqrt(low * high)
        decay = np.exp(-np.log(1000) * t / np.interp(centre, hz, t60))
        decay = decay + 4.1 * np.exp(-t / 0.024)   # near walls answer first
        decay *= np.clip((t - .003) / 0.003, 0, 1)
        response = response + from_db(np.interp(centre, hz, db)) * band * decay / np.linalg.norm(decay)
    return signal.fftconvolve(x, response)[:N]


def scene():
    """The spinner close by, in its room."""
    whirr = flicker(spin_in_hand() + spin_on_table(), depth_db=2.5, per_s=45, count=44)
    handling = ticks() + scuffs() + knocks() + arms_ring()
    near = whirr + handling + pings() + fingers()
    return (near + room(near) + fanning() + bumps() + palm() + background())[None]


def record(dry):
    """The microphone's port ripples the treble, the hardest clacks overload; the top is cut."""
    for hz, width, db in PORT:
        peak = signal.lfilter(*signal.iirpeak(hz, hz / width, fs=SR), dry)
        dry = dry + (from_db(db) - 1) * peak
    rounded = 0.82 * np.tanh(dry / 0.74)
    return signal.sosfilt(signal.ellip(10, .2, 70, CUTOFF_HZ, fs=SR, output="sos"), rounded)


dry = scene()
out = record(dry)
store_pcm(out)
```